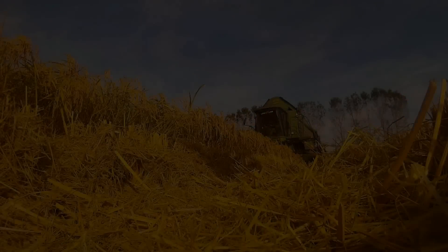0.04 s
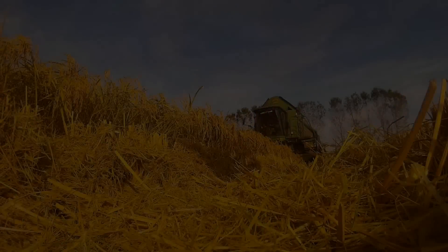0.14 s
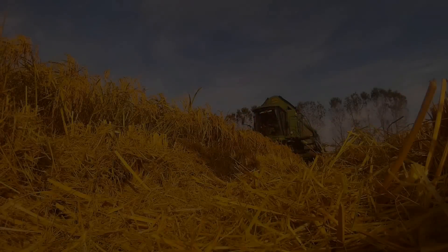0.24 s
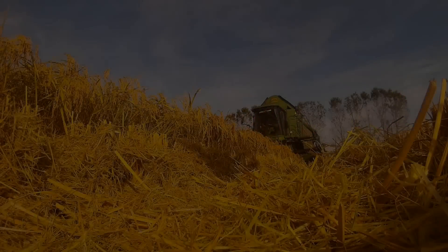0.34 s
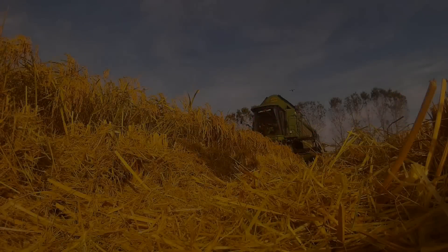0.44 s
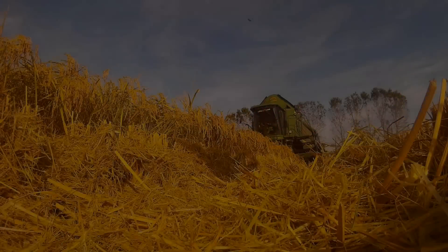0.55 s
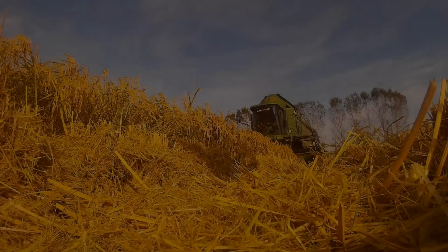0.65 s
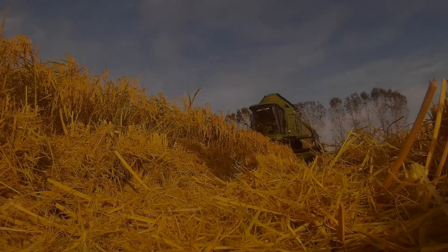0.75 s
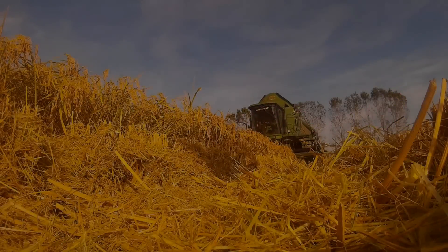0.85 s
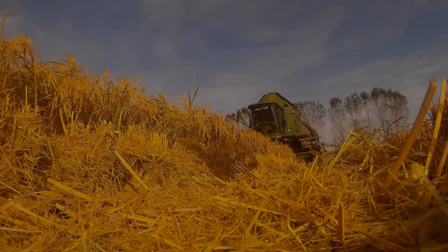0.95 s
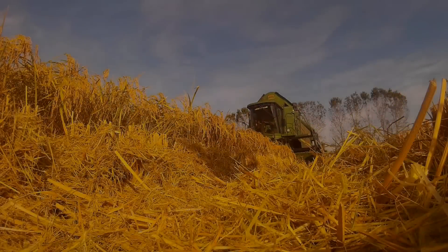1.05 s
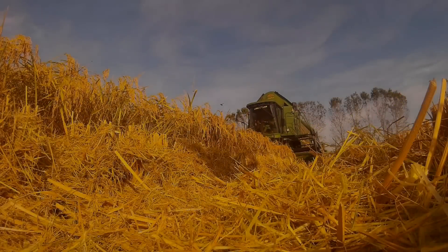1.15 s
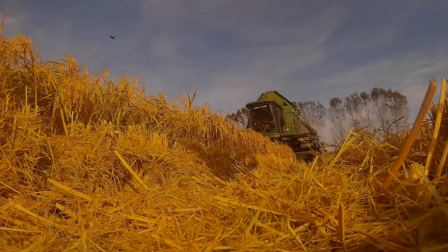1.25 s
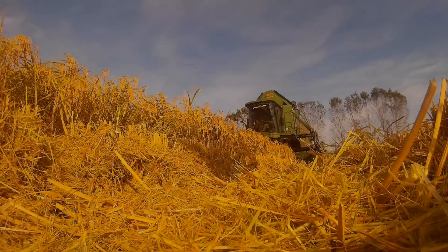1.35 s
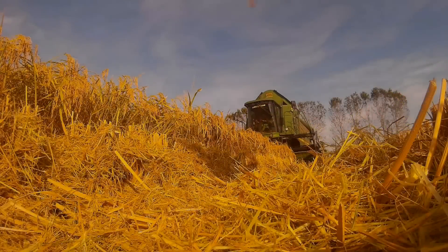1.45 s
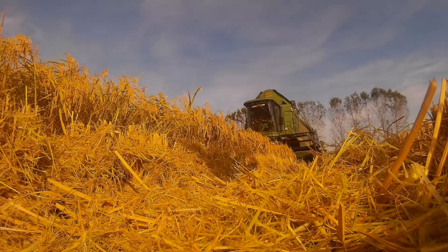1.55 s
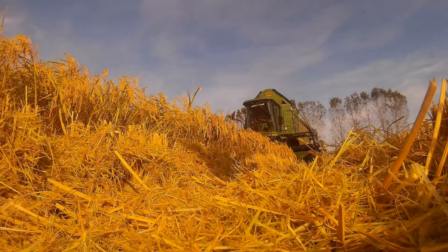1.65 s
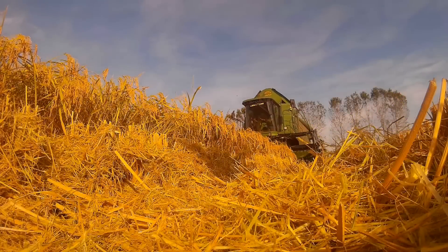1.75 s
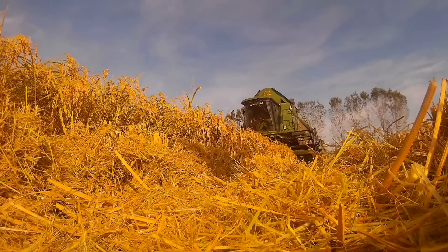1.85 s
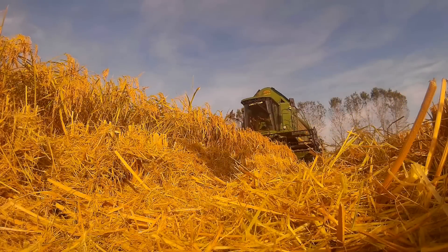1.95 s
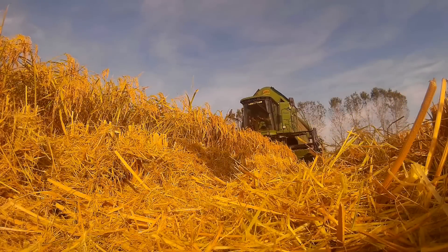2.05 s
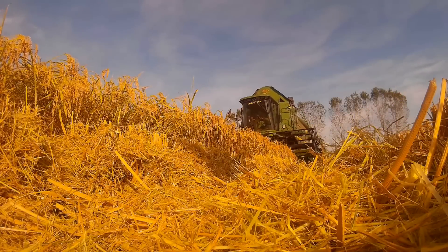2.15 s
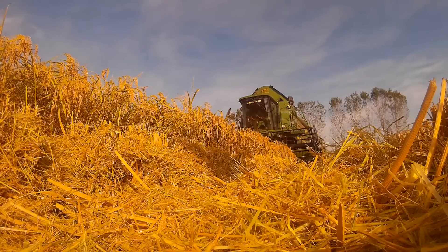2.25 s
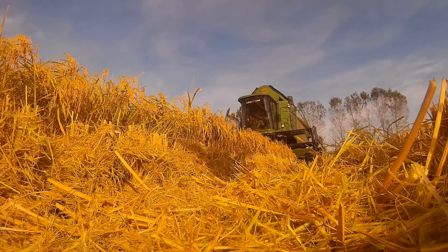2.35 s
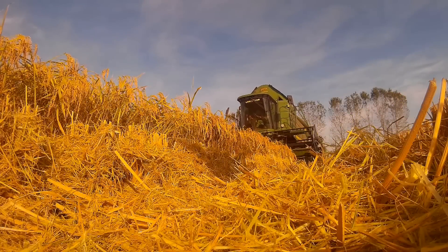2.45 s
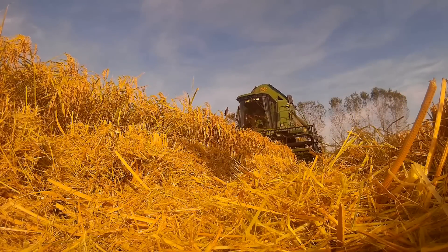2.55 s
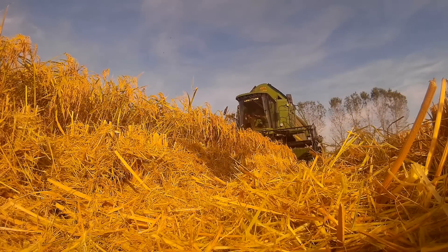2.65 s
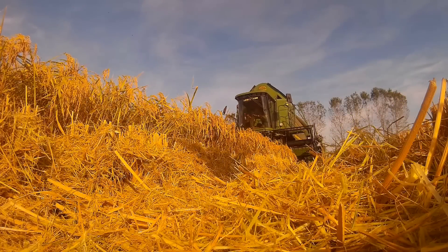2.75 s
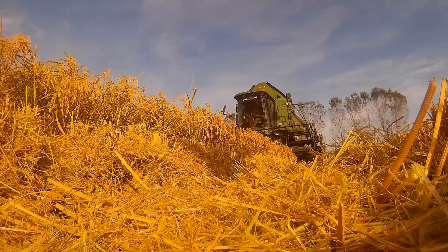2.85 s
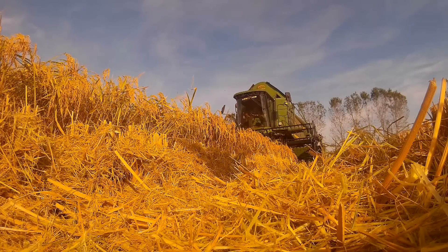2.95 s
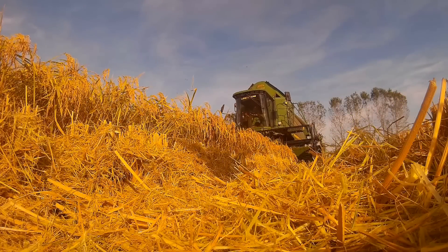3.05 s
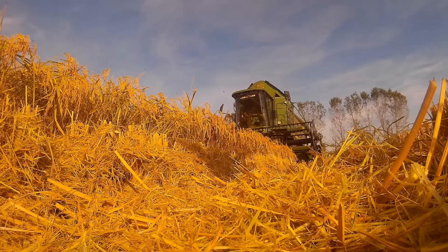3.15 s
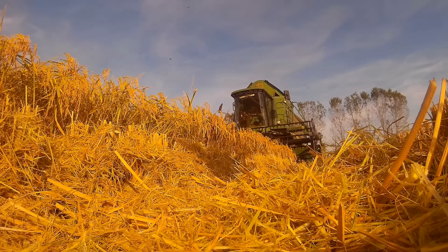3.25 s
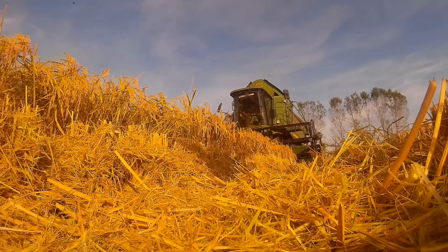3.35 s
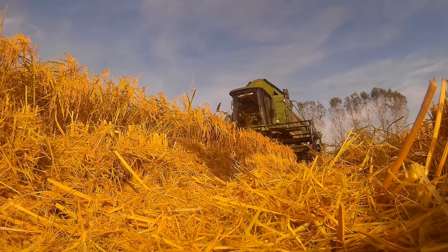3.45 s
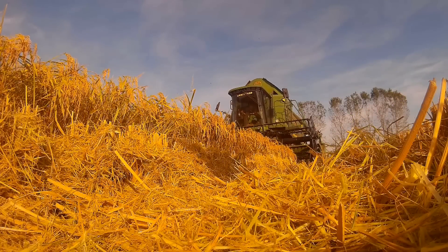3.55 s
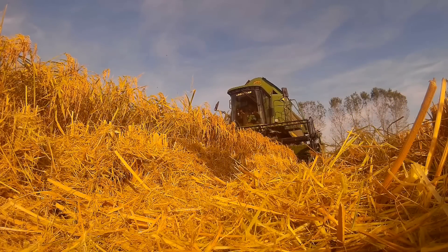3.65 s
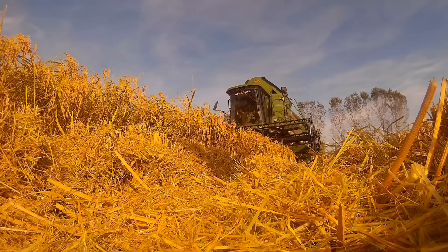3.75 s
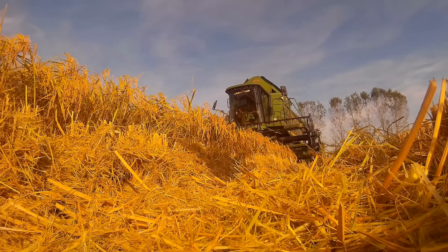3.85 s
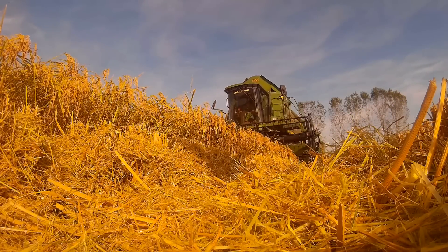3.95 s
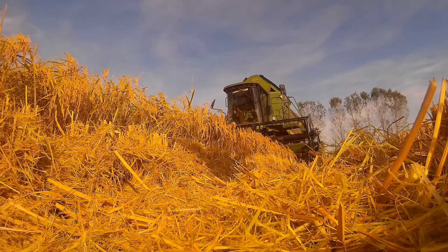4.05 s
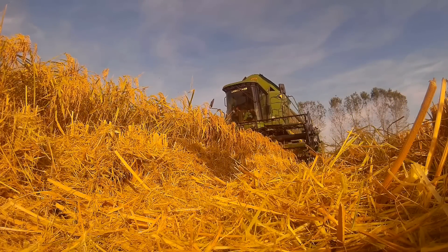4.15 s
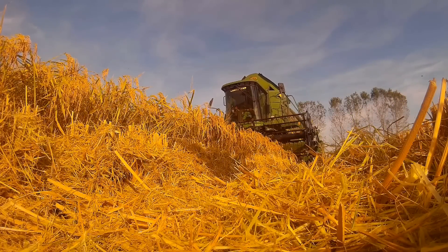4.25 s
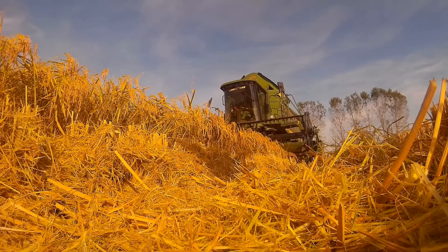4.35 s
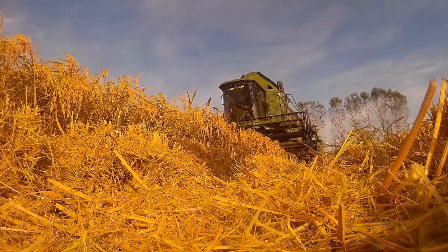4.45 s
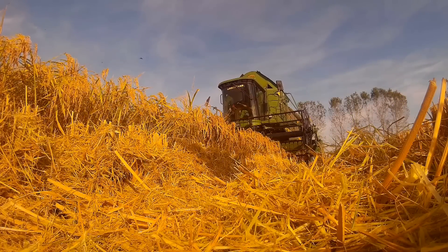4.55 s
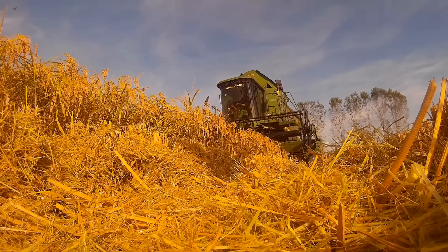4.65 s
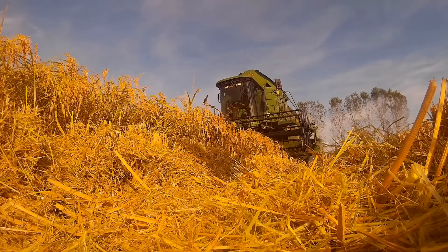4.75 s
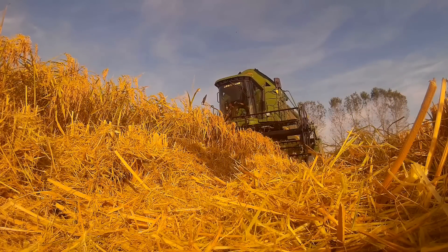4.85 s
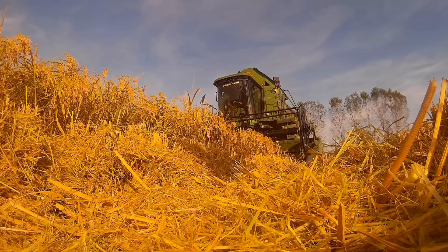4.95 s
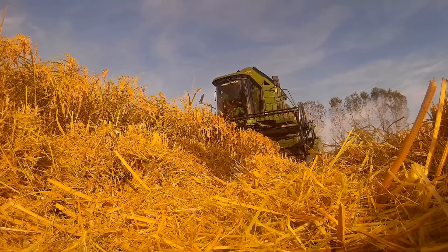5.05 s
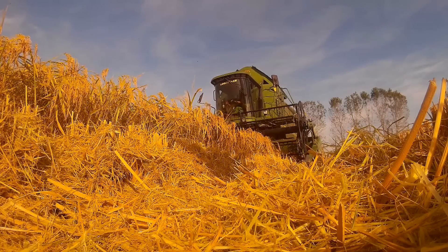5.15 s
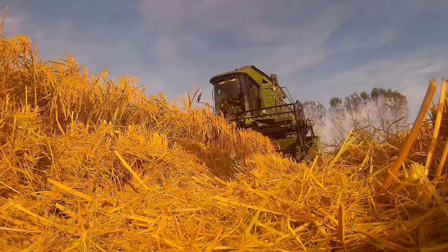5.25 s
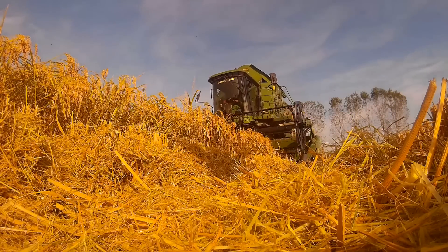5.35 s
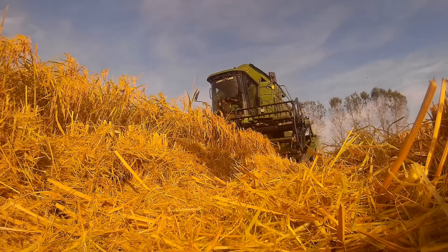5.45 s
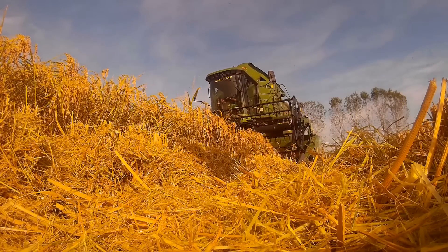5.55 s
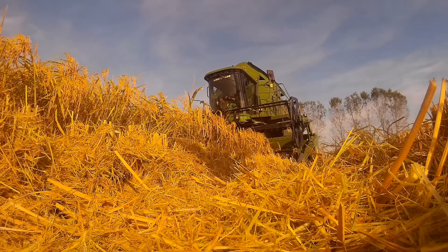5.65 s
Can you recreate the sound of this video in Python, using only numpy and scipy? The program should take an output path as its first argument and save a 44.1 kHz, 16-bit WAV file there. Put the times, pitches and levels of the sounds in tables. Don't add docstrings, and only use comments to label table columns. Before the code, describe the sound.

A combine harvester in an open crop field, heard from a small encased microphone low in the stubble. The sound starts quiet and fades in smoothly until about 1.6 seconds, then stays continuous. A deep diesel hum and booming sheet-metal panels sit beneath a mid-pitched drum and fan whirr and a dense, grainy roar of straw, fluttering about eight times a second with the cutter. The pitch sags slightly by 2 seconds as the engine loads, recovers towards 4, and sinks again by the end. Dull, very short knocks of straw clumps occur around 0.9, 1.5 to 2.4, then more thickly from 3.6 to 4.9 and near 5.5. Faint low swells boom from the grain tank. As the machine crawls nearer, engine, roar and faint chain rattle grow gradually louder, without passing. Everything is muffled, with little treble and a soft background hiss, ending while still running.

```python
import sys
import numpy as np
from scipy import signal
from scipy.fft import rfft, irfft, next_fast_len
from scipy.io import wavfile
from scipy.ndimage import uniform_filter1d

SR = 44100
rng = np.random.default_rng(int(sys.argv[2]) if len(sys.argv) > 2 else 0)


def ratio(d):
    e = np.asarray(d, float) / 20
    return 10 ** e


def generate_wav(signal):
    frames = np.transpose(np.atleast_2d(signal))
    scaled = np.clip(frames, -1, 1) * 32767
    pcm = np.round(scaled).astype(np.int16)
    wavfile.write(sys.argv[1], SR, pcm)


N = 251811

# time in seconds, drum bar rate in Hz.
DRUM_SPEED = [(0, 467), (.57, 466.4), (.86, 462), (1.14, 456.9), (1.71, 451), (2, 450), (2.3, 452.4),
              (2.86, 454), (3.14, 457.2), (3.43, 459), (4.1, 461.3), (4.57, 459.4), (5.14, 455.6),
              (5.43, 451.5), (5.71, 449)]
DRUM_HZ, FIRING_HZ, FAN_HZ, CHOPPER_HZ, KNIFE_HZ = 456., 56.46, 297.7, 378.2, 7.95
# multiple of the firing pattern, level in dB.
EXHAUST_NOTES = [(1, -30), (2, -19.5), (3, -15), (4, -22), (5, -20), (6, -38)]
# multiple of the knife stroke, level in dB.
KNIFE_NOTES = [(2, -53), (3, -43.5), (4, -41), (5, -29.5), (10, -33.5)]
# frequency in Hz, level in dB per Hz.
RUMBLE_TONE = [(15, -46.5), (30, -28), (45, -12), (70, -7), (88, -4.5), (130, -6.5), (190, -8), (270, -6),
               (330, -21), (500, -63)]
# frequency in Hz, width in Hz, boost in dB.
PANEL_RINGS = [(157, 39, 6), (223, 85, 10), (256, 8, -0.5)]
# frequency in Hz, level in dB per Hz.
ROAR_TONE = [(200, -38.5), (270, -8.5), (330, 2), (480, 0), (600, 1.5), (750, -2.5), (900, -11.5),
             (1000, -16.5), (1140, -25), (1350, -28.5), (1480, -35.5), (2000, -68)]
# frequency in Hz, level in dB per Hz.
RATTLE_TONE = [(1100, -44), (1450, -3.5), (1760, -4), (1990, -2.5), (2150, -4), (2400, -8), (2620, -21.5),
               (3100, -38.5), (3800, -45), (4400, -30), (6000, -54.5)]
# frequency in Hz, level in dB per Hz.
HISS_TONE = [(1500, -18), (2500, 2), (3200, 0), (5000, -3.3), (8000, -3.6), (11000, -4), (13000, -6),
             (14800, -10), (15700, -15), (17000, -42)]
# frequency in Hz, level in dB per Hz.
TANK_TONE = [(80, -40), (96, -6), (101, 0), (106, -6), (125, -50)]
# time in seconds, peak in dB, ring in Hz.
STRAW_CLUMPS = [(0.163, -38, 482), (0.22, -27, 470), (0.845, -18.5, 600), (0.908, -30, 470),
                (0.967, -17, 554), (1.51, -12.5, 450), (1.842, -13, 613), (2.06, -13.5, 450),
                (2.385, -13, 407), (3.639, -29, 445), (3.656, -23, 670), (3.694, -14, 460),
                (3.782, -45, 468), (3.949, -11, 520), (4.109, -10, 453), (4.223, -23, 557),
                (4.341, -14, 505), (4.484, -10, 588), (4.554, -31, 476), (4.616, -10, 458),
                (4.688, -10.5, 446), (4.889, -9, 608), (5.17, -33, 640), (5.398, -12.5, 447),
                (5.506, -21, 425), (5.532, -12, 620)]
# time in seconds, load in dB.
CROP_LOAD = [(0, 1.5), (.3, 1), (.6, -1), (1.5, -2), (1.8, 0), (2.1, -1.5), (2.4, 0), (2.7, -1.5), (3.3, 0),
             (3.9, -1), (4.5, -1), (4.8, 0.5), (5.1, -0.5), (5.4, 0), (5.71, 2.5)]
# time in seconds, level in dB.
DRUM_FACING = [(0, -6), (1, -1.5), (1.5, -1.5), (2.1, 0), (2.5, 1.5), (3, 0.5), (4.1, 0), (4.6, -3),
               (5, -8), (5.3, -2), (5.71, -13)]
# time of the top in seconds, level in dB.
TANK_SWELLS = [(0.401, -49), (.89, -48), (1.3, -36), (1.57, -40), (1.79, -31.5), (2.221, -44.5),
               (2.41, -36), (2.68, -33.5), (3.381, -35.5), (3.699, -39.5), (4.46, -41), (4.839, -42),
               (5.11, -37), (5.459, -30.5), (5.7, -31.5)]

LOUD_DB, HISS_DB = -27, -45
FADE_START, FADE_S = 0.21, 1.61
START_M, SPEED_M_S = 29.5, 1.71
OVERTONE_DB, DRUM_DB, CHOPPER_DB, FAN_DB, EXHAUST_DB = -22, -10, -16.5, -14, 0
RUMBLE_DB, ROAR_DB, RATTLE_DB = -7, -6.5, -39
RUMBLE_LOAD, ROAR_LOAD, RATTLE_LOAD = 0.7, 0.61, .6
RUMBLE_NEAR, ROAR_NEAR, RATTLE_NEAR = 0.97, 1.27, 1.6
OVERTONE_FACING, CHOPPER_FACING, FAN_FACING = 1, 1, 0.13
OVERTONE_PEAK_S, OVERTONE_FALL_DB_PER_S = 2.2, 3.5
CHOPPER_SWELL_DB, CHOPPER_SWELL_S, CHOPPER_TOP_S = 3.5, 1.75, 1.03
CLUMP_T60_S = .014
BOOM_RISE_DB_PER_S, BOOM_FALL_DB_PER_S = 138, 63.5


def colour(x, points, peaks=()):
    size = next_fast_len(N)
    hz = np.arange(size // 2 + 1) * SR / size + 1e-3
    point_hz, point_db = np.transpose(points)
    db = np.interp(np.log(hz), np.log(point_hz), point_db, right=-150)
    for peak_hz, width_hz, peak_db in peaks:
        db = db + peak_db / (1 + (2 * (hz - peak_hz) / width_hz) ** 2)
    y = irfft(rfft(x, size) * ratio(db), size)[:N]
    return y / np.std(y)


def walk(rate):
    hold = int(SR / rate)
    steps = np.repeat(rng.standard_normal(N // hold + 1), hold)
    y = uniform_filter1d(uniform_filter1d(steps, hold), hold)[:N]
    return y / np.std(y)


def curve(table):
    seconds, values = np.transpose(table)
    return np.interp(np.arange(N) / SR, seconds, values)


def tone(cycles, db, sway_db, slip):
    sway = .35 * walk(5) + 1.1 * walk(16)
    phase = 2 * np.pi * (cycles + rng.random()) + slip * walk(6)
    return np.sqrt(2) * ratio(db + sway_db * sway) * np.sin(phase)


def diesel(turns, db):
    return sum(tone(k * FIRING_HZ * turns, db + note_db, 2.4, .6) for k, note_db in EXHAUST_NOTES)


def rotors(turns, drum_db, overtone_db, chopper_db, fan_db):
    drum = tone(DRUM_HZ * turns, drum_db, 2.1, .45)
    overtone = tone(2 * DRUM_HZ * turns, overtone_db, .8, .2)
    fan = tone(FAN_HZ * turns, fan_db, 2.5, .5)
    fan_overtone = tone(2 * FAN_HZ * turns, fan_db - 8, 3, .6)
    chopper = tone(CHOPPER_HZ * turns, chopper_db, 2.3, .4)
    return drum + overtone + fan + fan_overtone + chopper


def knife(turns):
    return sum(tone(k * KNIFE_HZ * turns, db, 2, .3) for k, db in KNIFE_NOTES)


def threshing(turns, rumble_db, roar_db, rattle_db):
    stroke = np.sin(2 * np.pi * KNIFE_HZ * turns)
    feed = walk(6.6)

    rumble_level = ratio(rumble_db + 0.55 * walk(6.4))
    rumble = rumble_level * colour(rng.standard_normal(N), RUMBLE_TONE, PANEL_RINGS)

    blows = (rng.random(N) < 200 / SR) * ratio(2 * rng.exponential(size=N))
    straw = rng.standard_normal(N) + .35 * blows / np.std(blows)
    roar_level = ratio(roar_db + 0.55 * stroke + 0.78 * feed + 0.25 * walk(25))
    roar = roar_level * colour(straw, ROAR_TONE, [(1164, 67, -3.0)])

    links = rng.standard_normal(N) * ratio(2.3 * rng.exponential(size=N))
    rattle_level = ratio(rattle_db + 0.51 * stroke + 0.49 * feed + 0.34 * walk(11))
    rattle = rattle_level * colour(links, RATTLE_TONE, [(1756, 110, -3), (4400, 500, 4.5)])
    return rumble + roar + rattle


def clumps():
    length = 4000
    out, t = np.zeros(N + length), np.arange(length) / SR
    onset = np.sin(np.pi / 2 * np.minimum(t / 0.0011, 1)) ** 2
    decay = 1000 ** (-t / CLUMP_T60_S)
    for seconds, db, hz in STRAW_CLUMPS:
        i = int(seconds * SR)
        out[i:i + length] += ratio(db - 1.5) * np.sin(2 * np.pi * hz * t) * onset * decay
    return signal.sosfilt(signal.butter(8, 850, fs=SR, output="sos"), out[:N])


def tank():
    boom = colour(rng.standard_normal(N), TANK_TONE)
    even = boom / np.sqrt(uniform_filter1d(boom ** 2, size=4000) + .1)
    top_s, top_db = np.transpose(TANK_SWELLS)
    late = np.arange(N) / SR - top_s[:, None]
    swell_db = top_db[:, None] + np.minimum(BOOM_RISE_DB_PER_S * late, -BOOM_FALL_DB_PER_S * late)
    return ratio(swell_db.max(axis=0)) * even


def fade():
    return np.minimum(FADE_START + (1 - FADE_START) * np.arange(N) / SR / FADE_S, 1)


def scene():
    t = np.arange(N) / SR
    turns = np.cumsum(curve(DRUM_SPEED) / DRUM_HZ) / SR
    near_db = 20 * np.log10(START_M / (START_M - SPEED_M_S * t))
    load, facing = curve(CROP_LOAD), curve(DRUM_FACING)

    beam_db = -OVERTONE_FALL_DB_PER_S * np.abs(t - OVERTONE_PEAK_S)
    overtone_db = OVERTONE_DB + OVERTONE_FACING * facing + beam_db
    belt_db = CHOPPER_SWELL_DB * np.cos(2 * np.pi * (t - CHOPPER_TOP_S) / CHOPPER_SWELL_S)
    chopper_db = CHOPPER_DB + CHOPPER_FACING * facing + belt_db
    fan_db = FAN_DB + FAN_FACING * facing
    rumble_db = RUMBLE_DB + RUMBLE_LOAD * load + RUMBLE_NEAR * near_db
    roar_db = ROAR_DB + ROAR_LOAD * load + ROAR_NEAR * near_db
    rattle_db = RATTLE_DB + RATTLE_LOAD * load + RATTLE_NEAR * near_db

    machine = diesel(turns, EXHAUST_DB + near_db)
    machine = machine + rotors(turns, DRUM_DB + facing, overtone_db, chopper_db, fan_db)
    machine = machine + knife(turns)
    machine = machine + threshing(turns, rumble_db, roar_db, rattle_db)
    return (ratio(LOUD_DB) * fade() * machine + clumps() + tank())[None]


def roll_off(x):
    return signal.sosfilt(signal.butter(12, 15720, fs=SR, output="sos"), x)


def record(dry):
    loudness = uniform_filter1d(np.abs(dry[0]) / fade(), size=900) / ratio(LOUD_DB)
    hiss = ratio(LOUD_DB + HISS_DB) * loudness ** 0.23 * colour(rng.standard_normal(N), HISS_TONE)
    return roll_off(dry + hiss * fade())


dry = scene()
out = record(dry)
generate_wav(out)
```